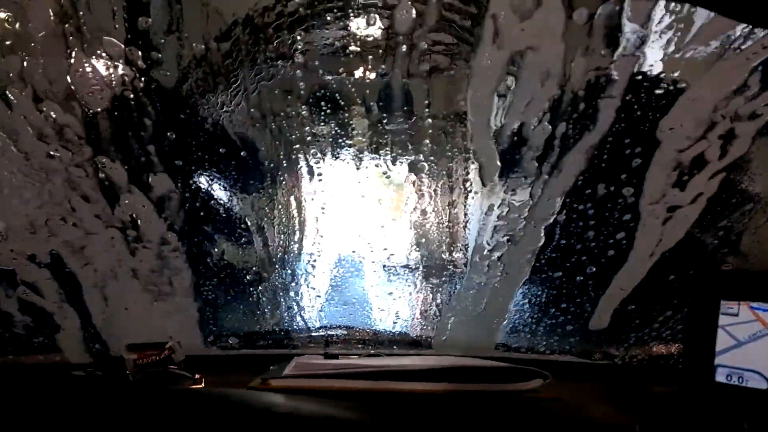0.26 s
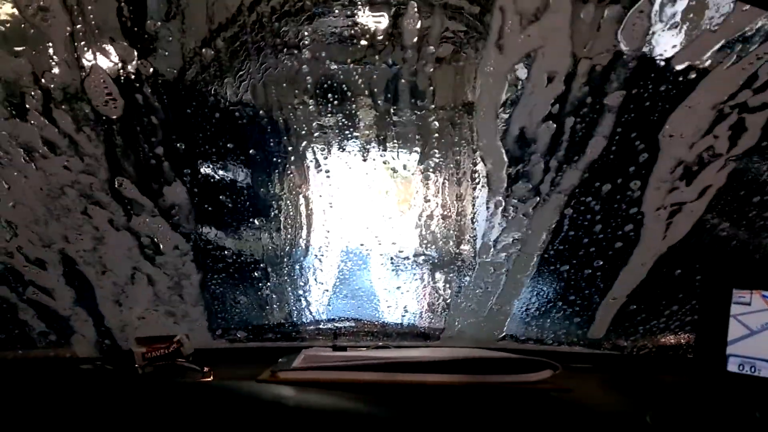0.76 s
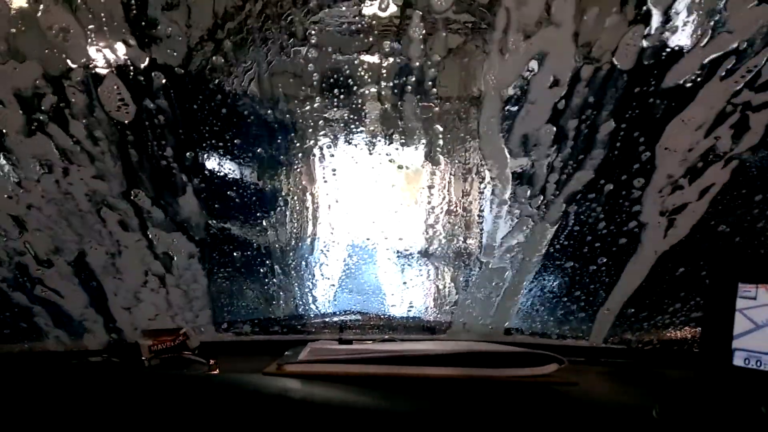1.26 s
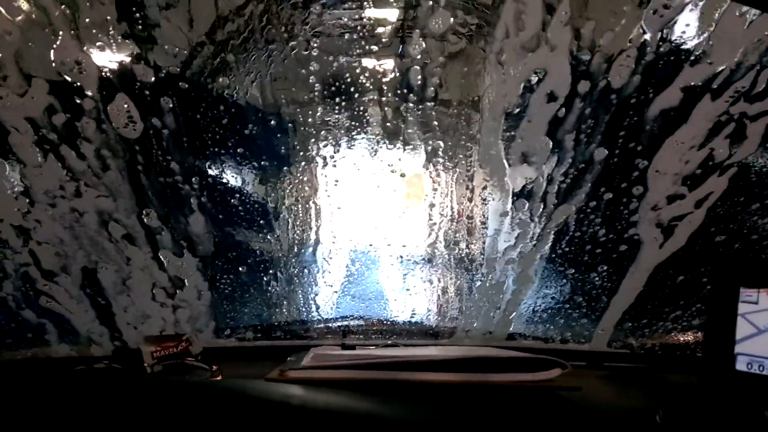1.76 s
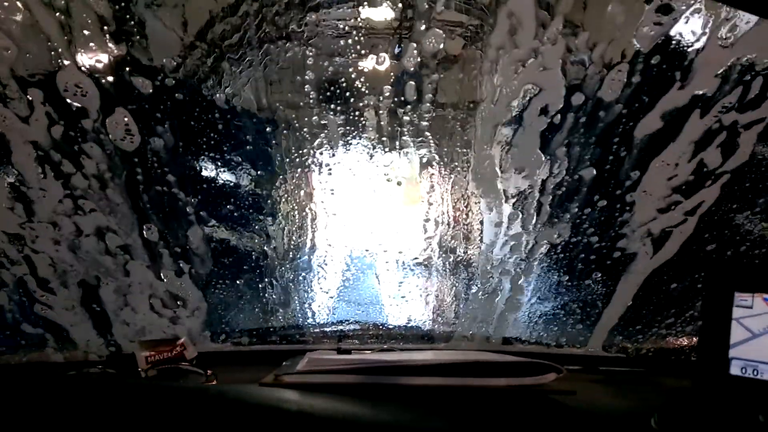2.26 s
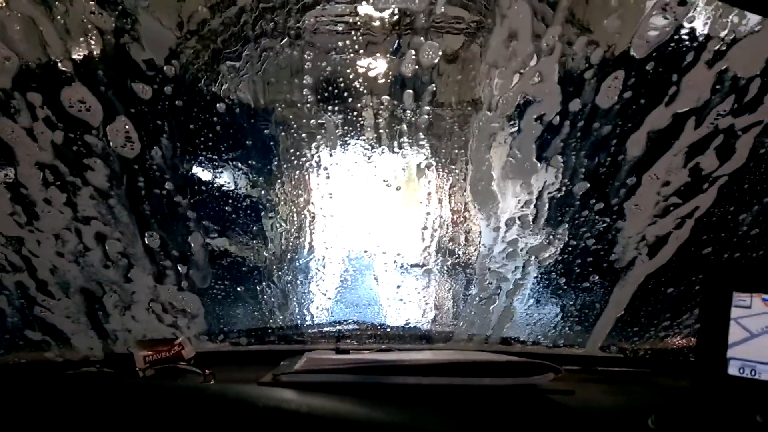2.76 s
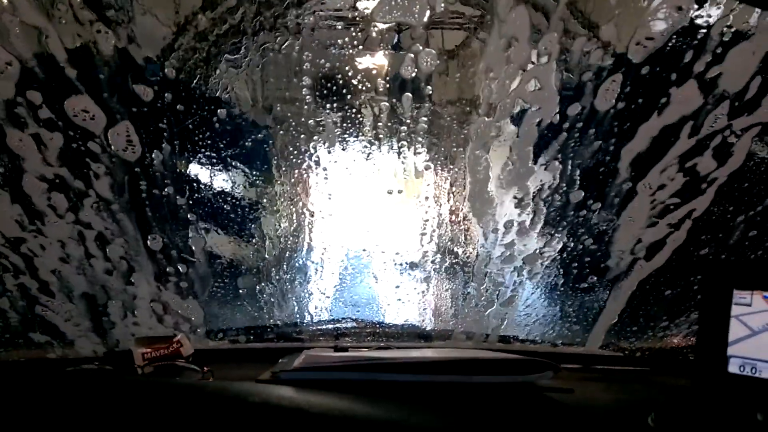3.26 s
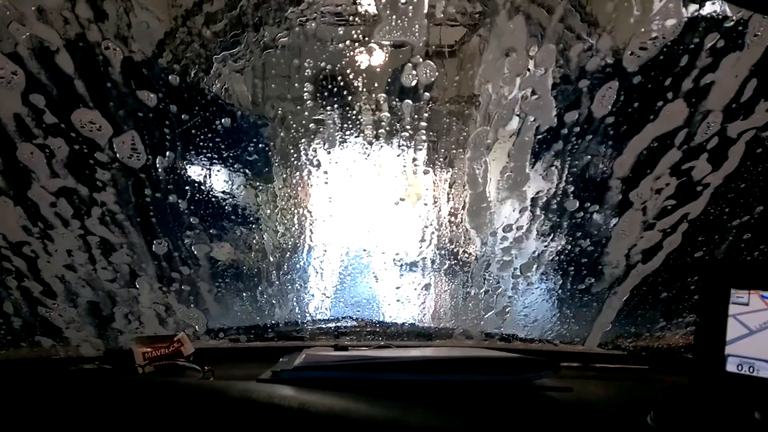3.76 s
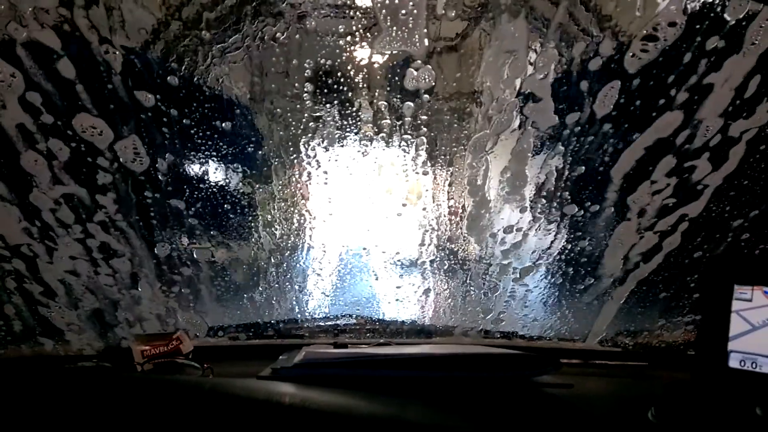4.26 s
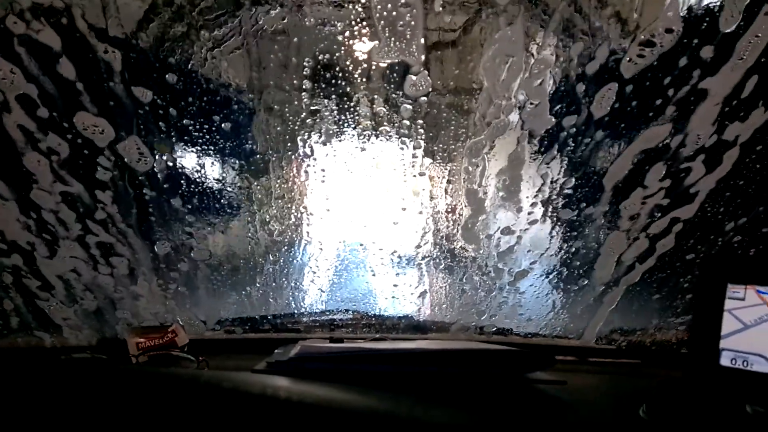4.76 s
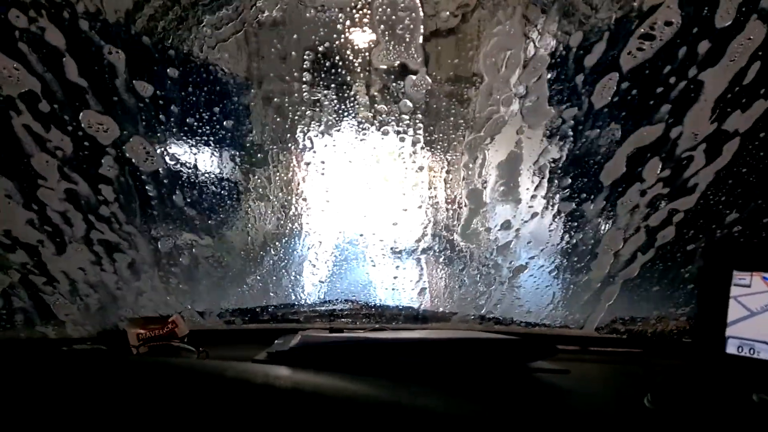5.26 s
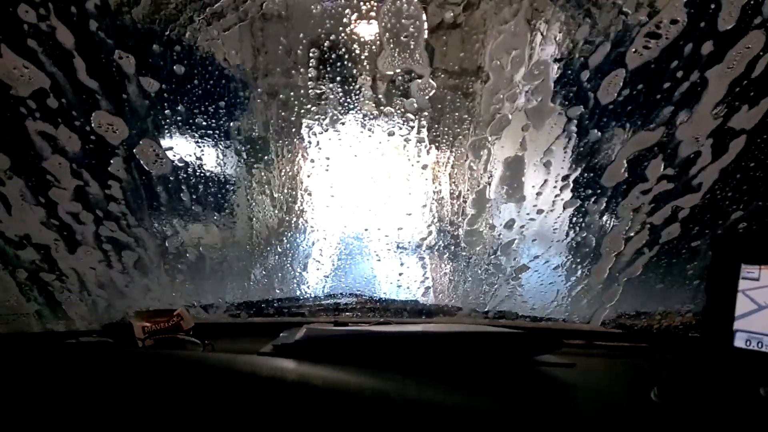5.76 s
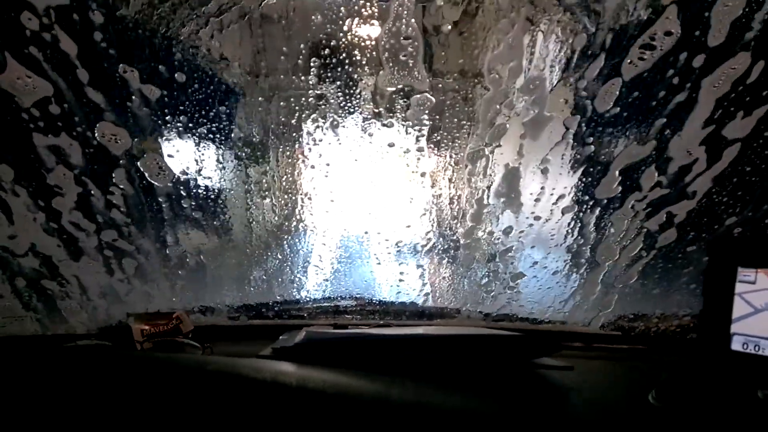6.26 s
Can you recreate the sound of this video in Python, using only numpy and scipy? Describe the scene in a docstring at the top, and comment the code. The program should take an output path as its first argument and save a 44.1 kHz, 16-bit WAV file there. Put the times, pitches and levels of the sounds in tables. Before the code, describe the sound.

Inside a car in a wash tunnel, wet cloth strips slap and drag along both sides over a deep, uneven cabin rumble with thumps.

```python
"""Wet cloth brushes beat both flanks of a car in a wash tunnel, heard inside by two spaced microphones.
The rumble of cabin air and body panels is noise in their resonant bands, with boom swells and thumps.
Dragged cloth and water are patters of coloured noise; drops are short tone bursts.
Landing strips are decaying noise bursts, glass and steel ring as decaying sines, and panel tones
swell and fade."""
import sys
import numpy as np
from scipy import signal
from scipy.fft import rfft, irfft, next_fast_len
from scipy.io import wavfile
from scipy.ndimage import uniform_filter1d

SR = 44100
rng = np.random.default_rng(int(sys.argv[2]) if len(sys.argv) > 2 else 0)


def materialize(psi):
    """Save the field psi as 16-bit PCM at rate SR to the path in sys.argv[1].

    A 1-D psi becomes a single channel; in a 2-D psi each row is a channel.
    """
    bounded = np.clip(np.atleast_2d(psi).T, -1, 1)
    quanta = np.round(bounded * 32767).astype(np.int16)
    wavfile.write(sys.argv[1], SR, quanta)


N = 286209
SIZE = next_fast_len(N + 8192)  # transform length, padded against wrap-around
HZ, T = np.fft.rfftfreq(SIZE, 1 / SR), np.arange(N) / SR

# strips of cloth landing: t/s, nominal slap peak level/dB, left-right lean/dB,
# thud over slap level/dB, fizz over slap level/dB
SLAP_EVENTS = [(0.0162, -17.5, 11, -10, -36), (0.0376, -20, 6, -9, -21), (0.0552, -11, 6, 1.5, -32),
               (0.1302, -15.5, -5, 1, -29), (0.1357, -28, -2, -13, -30), (0.188, -19.5, 7, 2.5, -33),
               (0.2084, -20, 1.5, 0.5, -30), (0.2427, -28, 1, 3, -30), (0.2743, -28, 1, -14, -28),
               (0.302, -22, 6.5, 4, -36), (0.3614, -26.5, 6, 2, -33), (0.381, -31.5, -4, 5, -35),
               (0.4232, -24, 3, -20, -22), (0.438, -19, 6.5, 5, -17), (0.6012, -22, 10, 2, -30),
               (0.6634, -31.5, 5, -8, -35), (0.828, -29.5, -3.5, 8, -29), (1.005, -43.5, 6, 9, -25),
               (1.0416, -20, -12, -18, -23), (1.132, -25, 17.5, 1.5, -38), (1.243, -28, -2, -8, -30),
               (1.264, -22, 2.5, -2, -23), (1.6177, -31, -0.5, -6, -35), (1.749, -29.5, -6, -8, -39),
               (1.871, -26.5, -2, -16, -39), (2.1148, -33.5, 0, 19, -33), (2.193, -30, -3, -8, -36),
               (2.265, -25, -7, -13, -34), (2.286, -20, 8, 4.5, -33), (2.334, -28.5, 9, -11, -36),
               (2.4751, -28, 9.5, 18.5, -35), (2.507, -22, 5, -10, -39), (2.565, -20.5, -12, -9, -17.5),
               (2.6417, -19, -5, -1.5, -19.5), (2.784, -36.5, 1, -9.5, -35),
               (2.903, -19.5, -14, -13.5, -41), (2.911, -24, -1, -7.5, -30), (2.927, -13.5, 8, 3.5, -22),
               (2.933, -20, -1, -6, -23), (2.961, -26, -1, 1, -33), (3.0094, -25, 2, 12.5, -32),
               (3.045, -24, -1, -10, -28), (3.056, -24, -1, -20, -15), (3.109, -31.5, 1, -6, -33),
               (3.1612, -21, 5, -4, -33), (3.179, -24.5, -1, -9, -33), (3.199, -19.5, 2, -12.5, -36),
               (3.2135, -23, -4, -7, -30), (3.237, -19, -7, -12, -18), (3.4028, -22, -9, -12.5, -28),
               (3.4476, -33.5, 4, 6, -31), (3.511, -24.5, -17, 8.5, -46), (3.5404, -24.5, -3, -9, -33),
               (3.55, -19, -0.5, 3, -37), (3.5768, -19.5, 1.5, -6.5, -26), (3.6804, -32.5, 9.5, -13.5, -26),
               (3.749, -24, -16, 19, -30), (3.885, -19.5, -17, -5.5, -18), (3.9642, -29.5, 3, 15, -39),
               (3.98, -25, 4.5, 16, -30), (4.001, -21, -8.5, 9.5, -35), (4.032, -33, 0.5, -6, -33),
               (4.079, -18.5, 1, 11, -15), (4.166, -29.5, 4, 10.5, -14), (4.2467, -24.5, -17, 1.5, -29),
               (4.308, -27.5, 10, -14, -58), (4.359, -22, 14, -2.5, -31), (4.433, -29, 10.5, -5.5, -33),
               (4.4699, -21, -1, 3.5, -20), (4.535, -24, 10, 0, -32), (4.613, -32, 0, 5, -33),
               (4.766, -29, 0, 2, -35), (4.775, -23.5, 11.5, 9.5, -24), (4.8155, -22.5, 7, -6, -36),
               (4.87, -28.5, -3.5, 11, -32), (4.94, -33.5, -2, 7, -32), (5.2093, -22.5, -3, 3, -14),
               (5.221, -23.5, -2, -11, -13.5), (5.2713, -26, -6, -3, -31), (5.283, -26, 0, -5, -28),
               (5.311, -22.5, -5, -0.5, -8), (5.329, -19, -9, -13, -30), (5.3614, -13.5, 5, -7, -25),
               (5.392, -26, -2, -12, -29), (5.425, -25.5, 6.5, 19, -20), (5.448, -19.5, -1.5, -5, -20),
               (5.496, -19, 18.5, -12, -34), (5.531, -31, 3, -6, -21), (5.551, -25.5, -4, -2, -29),
               (5.5772, -24, -9.5, -0.5, -17), (5.605, -28, -5.5, -9, -31), (5.679, -20.5, -4, -11, -15),
               (5.7626, -20.5, 2.5, -4.5, -20), (5.821, -27, 0.5, -1, -31), (5.849, -22, -9.5, 14, -34),
               (5.8996, -27, 17.5, -5, -32), (5.934, -24, 3.5, -5, -23), (6.056, -26, -4, -1, -18),
               (6.092, -15.5, -16, 8.5, -20), (6.179, -21, 7, -3.5, -27), (6.296, -30, 0, -6, -12),
               (6.468, -23.5, 3.5, 21, -30)]
# spectral density of the low scrub of cloth: f/Hz, relative level/dB
SCRUB_COLOUR = [(320, -10), (550, -3), (669, -6), (826, -4), (1070, -8.5), (1170, -7.5), (1420, -17.5),
                (1600, -13), (2080, -23), (3520, -120)]
# spectral density of the hiss of cloth and water: f/Hz, relative level/dB
HISS_COLOUR = [(820, -3.5), (1400, 2.5), (1930, 1.5), (2690, -1), (3120, -1.5), (3930, -7.5), (5000, -12.5),
               (5820, -16), (6600, -20), (7200, -27.5), (9220, -38), (15600, -120)]
# spectral density of the fine spray and fizz: f/Hz, relative level/dB
FIZZ_COLOUR = [(5000, -22.5), (7000, -3), (8500, -5), (10500, -7), (13000, -11.5), (14300, -17),
               (15500, -17.5), (17000, -28.5)]

LEFT_LEAD_S, RIGHT_LEAD_S = 9 / SR, 15 / SR  # lead of each brush at its nearer microphone, s
SCRUB_LEAD = 0.66  # the low scrub travels partly through the shell, so it keeps only part of the lead
LEFT_BRIGHT_DB, RIGHT_BRIGHT_DB = -3, 2.5  # treble tilt of each brush, dB at 6 kHz and above
LANDING_MS = 0.8  # time constant of a strip's landing, ms


def gain_of(db):
    """Level law: the amplitude ratio is ten to the power dB / 20."""
    return 10 ** (np.asarray(db) / 20)


def read(points, hz):
    """Interpolation of a spectrum along a logarithmic frequency axis."""
    f, value = np.transpose(points)
    return np.interp(np.log(hz + 1), np.log(f + 1), value)


def columns(rows):
    """Linear interpolation in time: each column of a curve, sample by sample."""
    s, *values = np.transpose(rows)
    return [np.interp(T, s, v) for v in values]


def add(mix, s, sound):
    """Superposition: a sound adds to the mix from time s onward."""
    part = mix[round(s * SR):][:len(sound)]
    part += sound[:len(part)]


def swells(peaks, lengths, heights, squareness=2):
    """Sum of smooth bumps, length measured between 1/e points; squareness over 2 steepens the edges."""
    t = T[::32]
    total = 0
    for s, length, height in zip(peaks, lengths, heights):
        offset = 2 * (t - s) / max(length, 0.02)
        total = total + height * np.exp(-abs(offset) ** squareness)
    return np.interp(T, t, total)


def patter(per_s, spread_db, t60):
    """Shot-noise envelope of rms 1: many random small blows of uneven size, each decaying exponentially."""
    struck = rng.random(N + SR) < per_s / SR
    sizes_db = spread_db * np.minimum(rng.exponential(1, N + SR), 4)
    power = gain_of(2 * sizes_db) * struck
    decay = gain_of(-120 / t60 / SR)  # power falls by 60 dB in t60
    power = signal.lfilter([1], [1, -decay], power)[SR:] + 1e-9  # the first second only builds up
    return np.sqrt(power / power.mean())


def heard(envelope, colour, lead_s):
    """Partial coherence: coloured noise at both microphones, its alike part lead_s early at the left."""
    # share of the power alike at both microphones, the rest is cabin scatter: f/Hz, share (0-1)
    alike_share = [(20, 0.98), (40, 0.98), (80, 0.99), (150, 0.94), (400, 0.86), (800, 0.72), (1500, 0.78),
                   (3000, 0), (7000, 0.1), (14000, 0.2)]
    shape = gain_of(read(colour, HZ))
    alike = np.clip(read(alike_share, HZ), 0, 1)
    common, left, right = rfft(envelope * rng.standard_normal((3, N)), SIZE)
    turn = np.exp(1j * np.pi * HZ * lead_s)  # phase turn of half the lead
    pair = np.sqrt(alike) * common * [turn, 1 / turn]
    pair = pair + np.sqrt(1 - alike) * np.array([left, right])
    middle = alike * turn.real ** 2 + (1 - alike) / 2  # power in the mean of the two microphones
    rms = np.sqrt(np.mean(middle * shape ** 2))
    return irfft(pair * shape / rms, SIZE)[:, :N]


def sided(x, pan_db):
    """Level difference between microphones: half is added at the left, half taken at the right."""
    return gain_of([[pan_db / 2], [-pan_db / 2]]) * x


def tinted(colour, bright_db):
    """Spectral tilt: the treble changes by bright_db over the octave above 3 kHz, then stays level."""
    return [(hz, db + bright_db * np.clip(np.log2(hz / 3000), 0, 1)) for hz, db in colour]


def lumps():
    """Slow random level in dB: smaller blows make the drumming uneven."""
    spread_db, span = 1.7, round(0.046 * SR)  # standard deviation, smoothing span in samples
    x = uniform_filter1d(uniform_filter1d(rng.standard_normal(N), span), span)
    return spread_db * x / x.std()


def steadied(x, size):
    """Forced resonance: unbroken beating holds it near rms 1 over every short span of samples."""
    power = uniform_filter1d(uniform_filter1d(x.mean(0) ** 2, size), size // 2)
    return x / np.sqrt(np.abs(power) + 0.03)


def ringing(x, depth_db):
    """Modal response: panels take turns, so narrow bands swell for about a tenth of a second."""
    z = signal.stft(x, SR, nperseg=4096, noverlap=3072)[2]
    patches = rng.standard_normal(z[0].shape)
    patches = uniform_filter1d(uniform_filter1d(patches, 2, 0), 5, 1)
    gain = gain_of(depth_db * patches / patches.std())
    gain = gain / np.sqrt(np.mean(gain ** 2))
    return signal.istft(z * gain, SR, nperseg=4096, noverlap=3072)[1][:, :N]


def mottled(x, depth_db):
    """Varying radiators: strips land on other patches of glass or steel, shifting the colour by depth_db."""
    hz, _, z = signal.stft(x, SR, nperseg=256, noverlap=128)
    patches = rng.standard_normal(z[0].shape)
    patches = uniform_filter1d(uniform_filter1d(patches, 3, 0), 4, 1)
    depth = depth_db * np.minimum(hz / 1400, 1)[:, None]  # the lows stay more even
    gain = gain_of(depth * patches / patches.std())
    gain = gain / np.sqrt(np.mean(gain ** 2, 1, keepdims=True))
    return signal.istft(z * gain, SR, nperseg=256, noverlap=128)[1][:, :N]


def drumming(knock_db):
    """Forced vibration: cabin air, panels and shell sound as noise in their resonant bands."""
    # steady drumming under the swells and blows: t/s, cabin boom level/dB, panel thrum level/dB
    drum_levels = [(0.0, -18, -22), (0.45, -20.5, -24), (0.81, -16.5, -22), (1.61, -14.5, -21),
                   (1.99, -17.5, -24.5), (2.15, -21, -24.5), (2.86, -10, -19.5), (3.03, -10.5, -26.5),
                   (3.2, -15.5, -17.5), (3.4, -19.5, -20.5), (4.7, -12.5, -21.5), (4.88, -17, -26),
                   (5.39, -20.5, -18), (5.73, -18, -20.5), (6.22, -19, -16.5), (6.49, -13.5, -23)]
    # random swells of the narrow low boom: peak t/s, length/s, boom level/dB
    boom_swells = [(0.255, 0.075, -12.5), (0.44, 0.053, -14), (0.657, 0.37, -18), (1.09, 0.033, -19),
                   (1.227, 0.041, -15.5), (1.622, 0.095, -21.5), (1.964, 0.018, -9), (2.198, 0.2, -15),
                   (2.267, 0.029, -12), (2.56, 0.16, -13), (2.95, 0.062, -14), (3.016, 0.024, -16),
                   (3.174, 0.088, -10.5), (3.473, 0.15, -11), (3.767, 0.082, -11.5), (3.974, 0.065, -17.5),
                   (4.062, 0.27, -14), (4.58, 0.029, -23), (4.68, 0.2, -14.5), (5.009, 0.021, -10.5),
                   (5.194, 0.089, -16.5), (5.693, 0.24, -20), (5.878, 0.059, -15), (6.026, 0.039, -10.5)]
    # heavy blows on the panels: peak t/s, length/s (halved for the knock), thrum level/dB, knock level/dB
    thumps = [(0.036, 0.028, -10.5, -43), (0.197, 0.022, -25.5, -24), (0.983, 0.017, -16, -21),
              (1.378, 0.049, -23.5, -26.5), (1.557, 0.14, -24.5, -47), (2.164, 0.042, -13.5, -25),
              (2.296, 0.13, -18.5, -43), (2.672, 0.016, -14.5, -42), (2.743, 0.057, -19, -37),
              (2.99, 0.14, -16.5, -72), (3.477, 0.035, -23, -34), (3.725, 0.014, -21.5, -28),
              (3.8, 0.027, -14, -21), (4.474, 0.047, -21, -28), (4.578, 0.13, -30, -21.5),
              (4.689, 0.034, -14, -15.5), (4.791, 0.043, -15, -18.5), (5.033, 0.052, -15.5, -16),
              (5.355, 0.097, -13.5, -25), (5.518, 0.014, -25.5, -33.5), (5.77, 0.017, -20.5, -16.5),
              (5.857, 0.089, -13.5, -32), (6.096, 0.014, -14.5, -18.5), (6.184, 0.039, -12.5, -13),
              (6.433, 0.25, -15.5, -23.5)]
    # spectral densities of cabin air, panels and shell: f/Hz, relative level/dB
    boom_colour = [(10, -14), (20, -17.5), (30, -9), (37, -3.5), (43, -2.5), (50, -5), (62, -12.5),
                   (75, -16.5), (100, -47.5), (160, -120)]
    thrum_colour = [(38, -42), (65, -9.5), (70, -6.5), (91, 4.5), (113, 4.5), (148, -2), (178, -12.5),
                    (190, -24), (250, -43.5), (420, -120)]
    knock_colour = [(100, -52.5), (170, 3), (345, 0.5), (446, -8.5), (543, -7.5), (650, -17), (840, -20),
                    (1430, -120)]
    boom_db, thrum_db = columns(drum_levels)
    s, length, swell_db = np.transpose(boom_swells)
    boom_power = gain_of(2 * (boom_db + lumps())) + swells(s, length, gain_of(2 * swell_db))
    s, length, panel_db, shell_db = np.transpose(thumps)
    thrum_power = gain_of(2 * (thrum_db + lumps())) + swells(s, length, gain_of(2 * panel_db))
    knock_power = gain_of(2 * (knock_db + lumps())) + swells(s, length / 2, gain_of(2 * shell_db))
    boom = steadied(heard(np.ones(N), boom_colour, 0), size=2000)
    thrum = steadied(ringing(heard(np.ones(N), thrum_colour, 0), depth_db=4.0), size=1300)
    knock = steadied(ringing(heard(np.ones(N), knock_colour, 0), depth_db=0.5), size=1800)
    return np.sqrt(boom_power) * boom + np.sqrt(thrum_power) * thrum + np.sqrt(knock_power) * knock


def drag_levels():
    """Modulation: sweeps lift and lulls sink knock, scrub, hiss and spray (dB); also the left share."""
    # cloth and water dragged between sweeps: t/s, shell knock level/dB, scrub level/dB,
    # hiss level/dB, spray level/dB, share from the left brush (0-1)
    base_levels = [(0.0, -26.5, -37, -39, -62, 0.85), (0.69, -26.5, -33, -41, -68, 0.97),
                   (0.83, -25.5, -34, -40, -69, 1), (1.03, -26, -31, -42.5, -68, 0.42),
                   (1.57, -26, -38, -44.5, -78.5, 0.5), (1.92, -25.5, -38, -47, -83, 0.42),
                   (2.62, -25.5, -37.5, -44.5, -71, 0.2), (2.73, -25, -34, -42.5, -68.5, 0.02),
                   (3.31, -24, -34.5, -43, -71, 0.42), (3.61, -24.5, -32.5, -39.5, -66, 0),
                   (3.94, -26, -33, -40.5, -66.5, 0.28), (4.36, -24.5, -32, -42.5, -67, 0.46),
                   (4.84, -29, -30, -39.5, -65.5, 0.55), (5.26, -22, -31, -39, -65, 0.1),
                   (5.42, -23.5, -30, -38.5, -61.5, 0.1), (5.84, -22, -30.5, -42, -70, 0.5),
                   (6.2, -25.5, -31.5, -40.5, -66, 0.22), (6.49, -20, -28, -39.5, -68, 0.5)]
    # bunches of cloth sweeping by: peak t/s, length/s, hiss lift/dB, scrub lift/dB (negative counts as 0)
    sweeps = [(0.067, 0.024, 8, 6.5), (0.139, 0.029, 11.5, 8.5), (0.209, 0.062, 5, 9), (0.307, 0.048, 6, 7),
              (0.386, 0.012, 4.5, 4), (0.479, 0.12, 3, 6), (0.548, 0.033, 4.5, 5.5), (0.615, 0.045, 6, 6),
              (0.67, 0.043, 5, 5.5), (0.765, 0.053, 0.5, 3), (0.874, 0.022, 4.5, -2),
              (1.001, 0.012, -2.5, 6.5), (1.06, 0.033, 3, -2), (1.148, 0.018, 7, -1),
              (1.265, 0.071, 3, 4.5), (1.365, 0.057, 3.5, 1.5), (1.467, 0.04, 6, 6), (1.544, 0.055, 4.5, 5),
              (1.66, 0.067, 3, 4.5), (1.759, 0.014, 3.5, 7.5), (1.873, 0.05, 3.5, 2),
              (1.799, 0.02, 3.5, 1.5), (1.959, 0.041, 4, 1.5), (2.06, 0.035, 7, 0.5),
              (2.154, 0.044, 8.5, 3.5), (2.207, 0.019, 8, 4.5), (2.272, 0.049, 8, -1),
              (2.36, 0.056, 2.5, 3), (2.412, 0.015, -2, 8), (2.528, 0.055, 4.5, 1.5), (2.637, 0.14, 3, 5.5),
              (2.798, 0.11, -1, 2), (2.942, 0.059, -4.5, -9), (2.966, 0.01, 0.5, 6.5),
              (3.019, 0.063, 6, -6.5), (3.21, 0.085, 9.5, 3.5), (3.378, 0.067, 6, 5),
              (3.452, 0.048, 8.5, 4), (3.588, 0.017, -2, 5.5), (3.646, 0.021, 1, 4), (3.703, 0.023, 8, 3),
              (3.753, 0.014, -5, 8), (3.871, 0.024, 6, 0), (4.013, 0.096, 2.5, 3), (4.206, 0.099, 4, 3),
              (4.33, 0.033, 11.5, 1.5), (4.485, 0.078, 4.5, 7.5), (4.616, 0.031, 4, 7.5),
              (4.78, 0.049, 2.5, 8), (4.875, 0.024, 2.5, 4.5), (4.946, 0.013, 1, 6.5),
              (5.07, 0.17, 0.5, 4.5), (5.234, 0.037, 0.5, 1), (5.325, 0.14, 2.5, 8), (5.558, 0.068, 5, 2.5),
              (5.611, 0.04, 5, 2.5), (5.671, 0.041, 6.5, 3), (5.742, 0.019, 2, 8), (5.868, 0.061, 7, 7.5),
              (6.073, 0.044, 7, 8.5), (6.182, 0.14, 4.5, 7.5), (6.334, 0.018, -2.5, 7)]
    # brief lulls between bunches: middle t/s, length/s, drop of the hiss/dB
    lulls = [(0.004, 0.02, 2), (0.045, 0.018, 0), (0.1, 0.027, 2), (0.174, 0.023, 7), (0.263, 0.02, 6.5),
             (0.346, 0.029, 9), (0.418, 0.02, 7), (0.536, 0.048, 8.5), (0.71, 0.03, 3), (1.123, 0.045, 4.5),
             (1.186, 0.029, 6.5), (1.43, 0.025, 3), (1.5, 0.02, 4.5), (1.583, 0.037, 10.5),
             (1.72, 0.03, 3.5), (1.82, 0.03, 3.5), (1.921, 0.03, 5), (2, 0.03, 4.5), (2.093, 0.033, 2),
             (2.184, 0.02, 3), (2.237, 0.03, 2), (2.32, 0.02, 3.5), (2.451, 0.033, 7), (2.69, 0.032, 9.5),
             (3.09, 0.03, 1), (3.145, 0.023, 2.5), (3.262, 0.033, 10), (3.916, 0.031, 3),
             (4.131, 0.033, 4.5), (4.655, 0.032, 4), (4.75, 0.03, 4), (4.918, 0.03, 3.5),
             (5.172, 0.037, 4.5), (5.493, 0.033, 7.5), (5.948, 0.025, 3), (6.324, 0.034, 3.5),
             (6.445, 0.03, 7)]
    squareness = 2.6
    knock_per_scrub, spray_per_hiss = 0.53, 1.28  # dB for each dB
    knock_db, scrub_db, hiss_db, spray_db, left = columns(base_levels)
    s, length, hiss_lift, scrub_lift = np.maximum(np.transpose(sweeps), 0)
    lull = swells(*np.transpose(lulls), squareness)
    high = swells(s, length, hiss_lift, squareness) - lull
    low = swells(s, length, scrub_lift, squareness) - 0.42 * lull
    knock_db = knock_db + knock_per_scrub * low
    spray_db = spray_db + spray_per_hiss * high
    return knock_db, scrub_db + low, hiss_db + high, spray_db, np.clip(left, 0.02, 0.98)


def dragging(scrub_db, hiss_db, spray_db, left):
    """Friction noise: each brush scrubs, hisses and sprays on its own flank, in its own patter."""
    brushes = [(left, LEFT_LEAD_S, 1.2, LEFT_BRIGHT_DB),
               (1 - left, -RIGHT_LEAD_S, -1.6, RIGHT_BRIGHT_DB)]
    out = 0
    for share, lead_s, pan_db, bright_db in brushes:
        strips = patter(per_s=300, spread_db=3.0, t60=0.091)
        scrub = heard(np.sqrt(share) * gain_of(scrub_db), SCRUB_COLOUR, SCRUB_LEAD * lead_s)
        scrub = ringing(scrub, depth_db=3.5)
        hiss = heard(np.sqrt(share) * strips * gain_of(hiss_db), tinted(HISS_COLOUR, bright_db), lead_s)
        spray = heard(np.sqrt(share) * strips * gain_of(spray_db), FIZZ_COLOUR, lead_s)
        out = out + sided(scrub + hiss + spray, pan_db)
    return out


def drops(hiss_db, per_s, spread_db, cycles, under_db):
    """Impulse excitation: flung drops tick as short rings of many pitches, following the hiss level."""
    struck_size = gain_of(spread_db * np.minimum(rng.exponential(1, N), 4))
    struck_size = struck_size * (rng.random(N) < per_s / SR)
    pitches = np.geomspace(1200, 7000, 16)
    spot = rng.integers(0, len(pitches), N)
    t, out = np.arange(1024) / SR, np.zeros((2, N))
    for k, hz in enumerate(pitches):
        turns = hz * t
        soft = (1 - np.exp(-turns)) ** 2  # a drop flattens over about one cycle
        decay = gain_of(read(HISS_COLOUR, hz) - 26 * turns / cycles)
        ring = hz * decay * soft * np.sin(2 * np.pi * turns)
        tick = signal.oaconvolve(struck_size * (spot == k), ring)[:N]
        late = 0.8 * np.roll(tick, rng.integers(5, 40))  # later and weaker at the farther microphone
        out = out + ([tick, late] if k % 2 else [late, tick])
    return gain_of(hiss_db - under_db) * out / np.std(out)


def place(out, s, sound, pan_db, brush):
    """Time and level differences: a sound from the left or right brush adds to both microphones."""
    lead_s = LEFT_LEAD_S if brush > 0 else -RIGHT_LEAD_S
    add(out[0], s - lead_s / 2, gain_of(pan_db / 2) * sound)
    add(out[1], s + lead_s / 2, gain_of(-pan_db / 2) * sound)


def pinging():
    """Damped modes: glass or steel under a strip sings as a close pair that swells fast and dies."""
    # patches that sing out: t/s, pitch f/Hz, nominal peak level/dB, left-right level/dB,
    # brush (positive left, negative right)
    pings = [(0.01, 1240, -29, 4, 1), (0.014, 2090, -34, 7, 1), (0.054, 2070, -25, 10, 1),
             (0.134, 1080, -24, 2, 1), (0.141, 1720, -27, 8, -1), (0.186, 4260, -35, 2, 1),
             (0.201, 900, -24, 3, 1), (0.214, 3200, -27, -3, 1), (0.237, 358, -15, 7, 1),
             (0.302, 2120, -28, 11, -1), (0.314, 1195, -31, 0, 1), (0.36, 2820, -36, 13, 1),
             (0.379, 1530, -24.5, 6, 1), (0.422, 4280, -33, 2, 1), (0.437, 1380, -29, 1, 1),
             (0.442, 1600, -27, 8, -1), (0.668, 1230, -29, 7, 1), (0.737, 946, -27, -3, 1),
             (0.828, 2800, -35, 8, 1), (0.867, 1330, -32, 10, 1), (1.04, 5860, -36, -11, 1),
             (1.052, 1420, -33, 3, 1), (1.056, 1450, -29, 4, 1), (1.13, 4930, -45, -7, 1),
             (1.149, 1610, -33, 10, 1), (1.264, 1290, -33, 5, 1), (1.873, 6070, -43, -8, 1),
             (2.113, 535, -24, -4, 1), (2.284, 970, -24.5, 4, -1), (2.287, 2190, -31, -13, 1),
             (2.472, 4860, -48, -10, 1), (2.505, 3230, -30.5, 2, -1), (2.562, 4900, -37, -4, 1),
             (2.641, 5700, -41, -10, 1), (2.783, 2310, -33, 0, 1), (2.9, 4730, -40, 6, 1),
             (2.921, 766, -26, 0, 1), (2.927, 2880, -21.5, 1, -1), (2.965, 1380, -29, 10, -1),
             (3.018, 4990, -41, -8, 1), (3.16, 4760, -33, -1, 1), (3.211, 4900, -34, -4, 1),
             (3.236, 4700, -38, -4, -1), (3.284, 331, -19, -1, 1), (3.322, 333, -25, 6, 1),
             (3.358, 1030, -29, -1, -1), (3.4, 3350, -34, -12, -1), (3.551, 3150, -31, 14, 1),
             (3.579, 5500, -44, -10, -1), (3.744, 896, -26, -2, 1), (3.749, 2380, -29, -16, -1),
             (3.884, 5400, -38, -2, -1), (3.979, 890, -26, -5, 1), (4.001, 2840, -31, 1, -1),
             (4.079, 4440, -32, 8, -1), (4.325, 1720, -27, -6, -1), (4.357, 6030, -53, -22, -1),
             (4.432, 1780, -32, 19, 1), (4.472, 757, -24, 2, 1), (4.607, 724, -30, 1, 1),
             (4.77, 890, -22.5, 1, 1), (4.87, 860, -23, 1, -1), (4.937, 555, -23, 0, 1),
             (5.094, 852, -25, 0, 1), (5.22, 5940, -38.5, -15, 1), (5.268, 1140, -28, 4, -1),
             (5.308, 6140, -40, -9, 1), (5.33, 1125, -17, 2, 1), (5.36, 4350, -33, -15, 1),
             (5.445, 5950, -43, -9, 1), (5.492, 1290, -31, 5, -1), (5.496, 5750, -41, -14, 1),
             (5.543, 1190, -23, -14, -1), (5.647, 1170, -20.5, -4, 1), (5.678, 5050, -43, -3, 1),
             (5.848, 3800, -33, -6, 1), (5.886, 834, -16, -2, -1), (5.9, 4720, -33.5, 11, 1),
             (6.055, 1020, -26, 2, -1), (6.089, 5420, -38, -14, -1), (6.193, 5940, -42, -9, 1),
             (6.334, 498, -22, -4, -1)]
    t60_s, rise_s = 0.045, 0.002  # at 1 kHz, shorter for higher pitches
    split_range = 0.08  # the second mode lies up to this fraction above or below the first
    t, out = np.arange(SR // 8) / SR, np.zeros((2, N))
    chances = rng.random((len(pings), 2))
    for (s, hz, db, pan_db, brush), (split, turn) in zip(pings, chances):
        slow = np.sqrt(1000 / hz)
        second_hz = hz * (1 + split_range * (2 * split - 1))
        pair = np.sin(2 * np.pi * hz * t) + 0.52 * np.sin(2 * np.pi * (second_hz * t + turn))
        shape = (1 - np.exp(-t / (rise_s * slow))) * gain_of(db - 60 * t / (t60_s * slow))
        place(out, s, 2 * shape * pair, pan_db, brush)
    return out


def slapping(busy_left):
    """Impact noise: a strip lands flat and sudden; its thud swells slower, its fizz dies sooner."""
    # spectral density of a slap: f/Hz, relative level/dB
    slap_colour = [(820, -29), (1400, -12.5), (1600, -7), (2030, -7.5), (2630, -8.5), (2950, -8),
                   (3570, -9.5), (4880, -15), (6500, -24.5), (7200, -30), (9220, -36.5), (15600, -120)]
    thud_t60_s, slap_t60_s, fizz_t60_s = 0.053, 0.055, 0.035
    snap_db, snap_t60_s = -2, 0.021  # the first crack of a slap, over its body
    t = np.arange(SR // 8) / SR
    power = np.zeros((2, 3, N))  # brush, then thud, slap, fizz
    landing = (1 - np.exp(-1000 * t / LANDING_MS)) ** 2
    thud = (1 - np.exp(-t / 0.0025)) ** 2 * gain_of(-120 * t / thud_t60_s)
    slap = landing * gain_of(-120 * t / slap_t60_s)
    fizz = landing * gain_of(-120 * t / fizz_t60_s)
    snap = landing * gain_of(2 * snap_db - 120 * t / snap_t60_s)
    for s, peak_db, pan_db, thud_db, fizz_db in SLAP_EVENTS:
        burst = gain_of(2 * (peak_db - 11.5))  # a noisy burst peaks well over its rms
        busy = busy_left[round(s * SR)]
        odds = busy / (1 - busy) * np.exp(0.15 * pan_db)
        left = odds / (1 + odds)  # the busier brush and the louder side get the larger share
        for brush, share in zip(power, (left, 1 - left)):
            add(brush[0], s, share * burst * thud * gain_of(2 * thud_db))
            add(brush[1], s, share * burst * (slap + snap))
            add(brush[2], s, share * burst * (fizz + snap) * gain_of(2 * fizz_db))
    brushes = [(power[0], LEFT_LEAD_S, 1.3, LEFT_BRIGHT_DB),
               (power[1], -RIGHT_LEAD_S, -2.1, RIGHT_BRIGHT_DB)]
    out = 0
    for parts, lead_s, pan_db, bright_db in brushes:
        colours = SCRUB_COLOUR, tinted(slap_colour, bright_db), FIZZ_COLOUR
        layers = zip(parts, colours, (SCRUB_LEAD, 1, 1))
        strike = sum(heard(np.sqrt(p), colour, part * lead_s) for p, colour, part in layers)
        out = out + sided(strike, pan_db)
    return out


def glass():
    """Modal excitation: every slap rings the side glass with other strengths and slightly other pitches."""
    # modes of the side glass: f/Hz, relative level/dB
    glass_modes = [(1650, -3.5), (2150, -4), (2870, -3), (3300, -3.5), (3800, -10.5), (4300, -6.5),
                   (4900, -11), (5450, -11.5), (5950, -17.5), (6600, -20)]
    under_slap_db, t60_s, spread_db = -19.5, 0.052, 6
    t, out = np.arange(SR // 16) / SR, np.zeros((2, N))
    hz, db = np.transpose(glass_modes)
    chances = rng.standard_normal((len(SLAP_EVENTS), 3, len(glass_modes)))
    for (s, peak_db, *_), (size, bend, side) in zip(SLAP_EVENTS, chances):
        modes = np.sin(2 * np.pi * np.outer(hz * (1 + 0.02 * bend), t))
        rise = 1 - np.exp(-1000 * t / LANDING_MS)
        shape = rise * gain_of(peak_db + under_slap_db - 60 * t / t60_s)
        strength = gain_of(db + spread_db * size)
        add(out[0], s, shape * (strength * gain_of(2.0 * side) @ modes))
        # some modes reach the right microphone in opposite phase
        add(out[1], s, shape * (strength * gain_of(-3.0 * side) * np.sign(bend) @ modes))
    return out


def panels():
    """Narrow-band resonance: a panel tone swells and fades under a bell curve, alike at both microphones."""
    # single panels ringing: peak t/s, length/s, pitch f/Hz, rms level at the peak/dB
    rings = [(0.071, 0.018, 101, -19), (0.202, 0.039, 161, -22), (0.211, 0.048, 93.4, -14),
             (0.235, 0.069, 354.4, -21.5), (3.486, 0.026, 119.6, -12.5), (3.805, 0.015, 170, -18),
             (4.78, 0.015, 224, -13), (5.227, 0.032, 154, -19.5), (5.305, 0.064, 136, -16),
             (5.349, 0.039, 133, -7.5), (5.403, 0.042, 114.3, -8.5), (5.53, 0.051, 129.5, -14.5),
             (5.773, 0.056, 140.4, -20), (5.839, 0.022, 156, -17.5), (5.84, 0.033, 255, -17),
             (5.89, 0.055, 96.5, -10), (6.125, 0.041, 118.3, -18), (6.181, 0.047, 228, -18.5),
             (6.19, 0.034, 150, -11.5), (6.276, 0.025, 253, -18), (6.424, 0.051, 129.6, -14.5)]
    out = np.zeros(N)
    for (s, length, hz, db), turn in zip(rings, rng.random(len(rings))):
        t = np.arange(-2 * length, 2 * length, 1 / SR)
        swell = np.exp(-(2 * t / length) ** 2)
        tone = np.sin(2 * np.pi * (hz * t + turn))
        add(out, s - 2 * length, np.sqrt(2) * gain_of(db) * swell * tone)
    return out


def pane(dragged, slapped):
    """Driven resonance: for a while two narrow bright bands, perhaps a glass pane, follow the cloth in spurts."""
    # spectral density of the bright bands: f/Hz, relative level/dB
    pane_colour = [(2500, -59), (2900, -13), (3100, 2), (3350, -17.5), (4200, -16.5), (4550, -8.5),
                   (4900, -5), (5250, -25.5), (5800, -60)]
    middle_s, length_s, level_db = 2.36, 2.2, -3.5  # level against the driving treble
    drive = (0.5 * dragged + slapped).mean(0)  # the slaps drive it most
    treble = irfft(rfft(drive, SIZE) * (HZ > 2000), SIZE)[:N]
    strength = np.sqrt(np.abs(uniform_filter1d(treble ** 2, 400)))
    window = swells([middle_s], [length_s], [1], 3.3)
    spurts = patter(per_s=320, spread_db=3.5, t60=0.096)
    return heard(gain_of(level_db) * window * strength * spurts, pane_colour, -RIGHT_LEAD_S)


def scene():
    """Superposition of the drumming, the ringing parts, the water and the cloth."""
    knock_db, scrub_db, hiss_db, spray_db, left = drag_levels()
    water = drops(hiss_db, per_s=600, spread_db=5.0, cycles=6, under_db=7.0)
    dragged = dragging(scrub_db, hiss_db, spray_db, left)
    slapped = slapping(left)
    cloth = mottled(dragged + pane(dragged, slapped), depth_db=2.0)
    cloth = cloth + mottled(slapped, depth_db=0.0)  # zero depth leaves the slaps' colour alone
    return drumming(knock_db) + panels() + pinging() + glass() + water + cloth


def record(dry):
    """Transducer response: each microphone's colour, soft saturation near full scale, then a band limit."""
    # difference in colour between the microphones: f/Hz, left-right level/dB
    tilt = [(60, 0.9), (100, -1.1), (170, 2.5), (290, 0), (490, 0.8), (820, 0.6), (1380, 3.5), (2330, -0.5),
            (3940, 0.5), (6000, -4), (8500, 2), (12500, -2.5)]
    edge_hz = 15830
    half = np.sqrt(gain_of(read(tilt, HZ)))
    coloured = irfft(rfft(dry, SIZE) * [half, 1 / half], SIZE)[:, :N]
    clipped = coloured / (1 + np.abs(coloured) ** 6) ** (1 / 6)
    lowpass = signal.firwin(511, edge_hz, window=("kaiser", 9), fs=SR)
    return signal.oaconvolve(clipped, lowpass[None], "same")


dry = scene()
out = record(dry)
materialize(out)
```